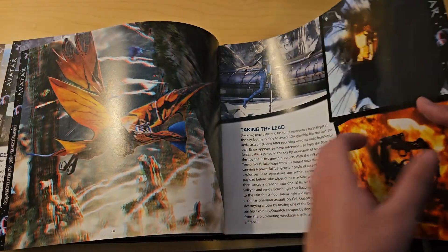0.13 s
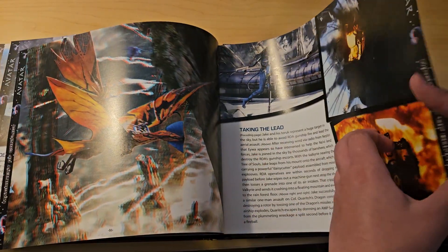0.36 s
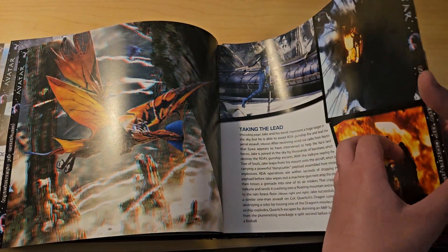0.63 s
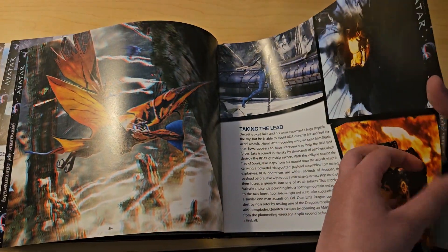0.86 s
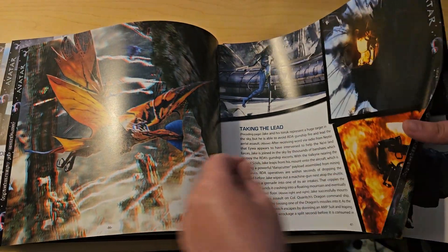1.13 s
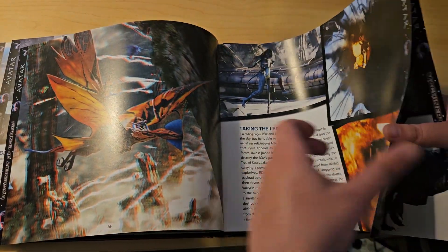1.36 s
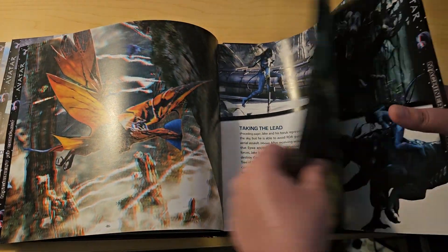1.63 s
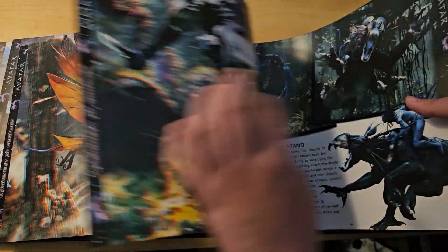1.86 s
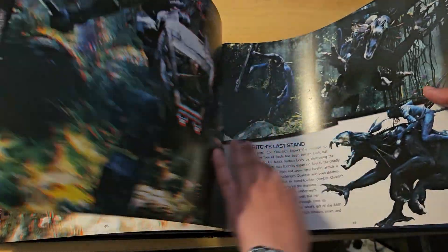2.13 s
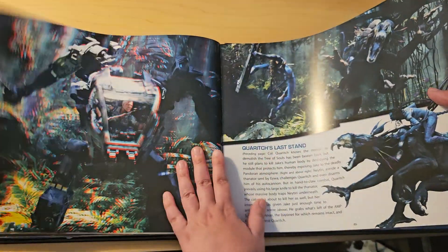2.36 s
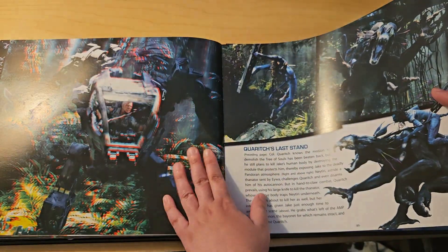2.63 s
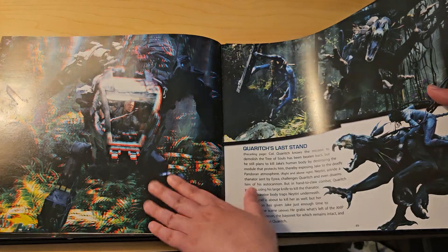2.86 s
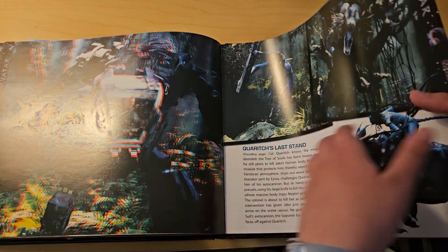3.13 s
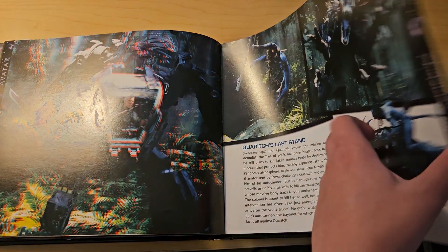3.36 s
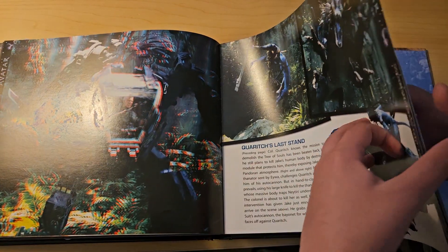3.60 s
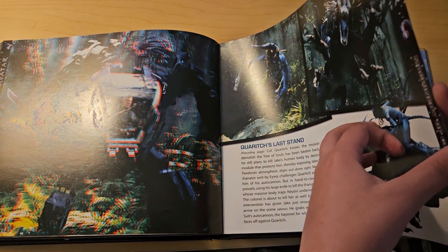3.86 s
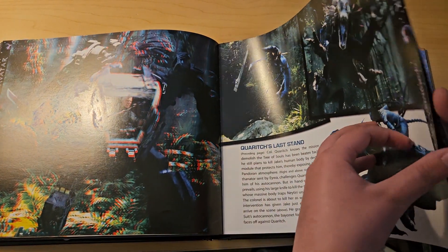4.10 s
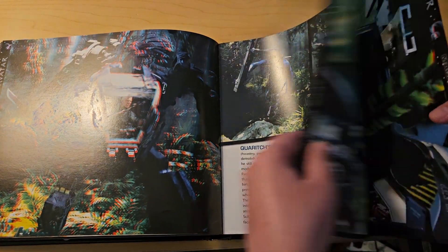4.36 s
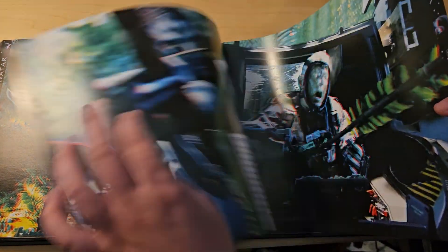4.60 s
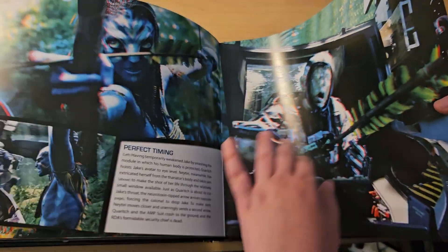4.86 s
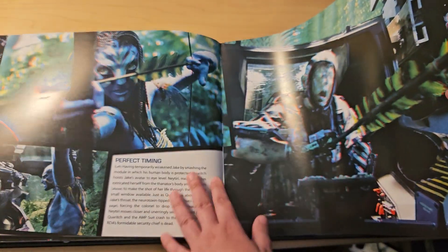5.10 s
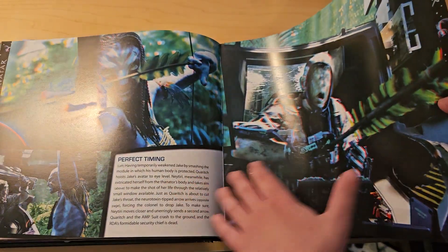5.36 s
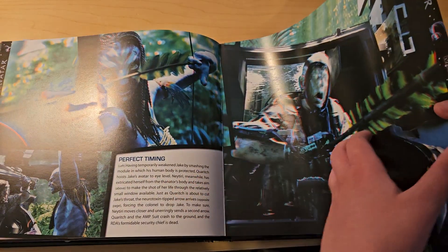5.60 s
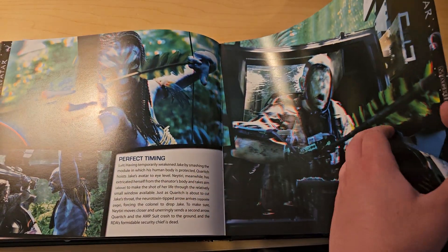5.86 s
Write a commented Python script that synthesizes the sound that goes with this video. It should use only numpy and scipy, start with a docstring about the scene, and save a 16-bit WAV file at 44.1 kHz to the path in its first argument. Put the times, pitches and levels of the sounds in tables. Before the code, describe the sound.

A large book with stiff glossy pages is handled on a table, close to a small stereo microphone in a quiet room with faint noise and an uneven, very low rumble. From 0 to 0.8 s there are only faint skin rubs and soft sheet movement. Around 0.9-1.1 s fingers scrape and slip off the page edge with bright puffs and a crisp pop. From 1.5 to 1.8 s the sheet lifts and flips in short scrapes, hollow pops and low air pushes. At 2.15-2.3 s it lands in a dense cluster of buckling pops, ending in one sharp, loud crease snap. Soft smoothing hisses follow from 2.7 to 3.1 s, then light fingertip scrapes at 3.2-3.5 s and a brighter rub at 3.7 s. A second, gentler turn runs from 4.15 to 5.1 s with wobbles, slips and small pops. Faint rubbing remains until 6 s.

```python
"""Turning the pages of a large book

Hands lift, turn and smooth glossy pages on a table, close to a small stereo microphone.
Skin hisses over the coating and page edges scrape: both are shaped noise that swells with each stroke.
The sheet wobbles and pushes air in low noise, buckles in ringing pops, and slips off fingers in bright puffs.
A crease snaps once, as a short sum of fading tones. A low, noise-like rumble, made from one uneven tone,
lies under it all in a quiet, noisy room."""
import sys
import numpy as np
from scipy import signal
from scipy.fft import irfft
from scipy.io import wavfile
from scipy.ndimage import uniform_filter1d

SR = 44100
rng = np.random.default_rng(int(sys.argv[2]) if len(sys.argv) > 2 else 0)


def boost(x):
    """Linear amplitude factor 10**(x/20) for a level x in decibels (scalar or array-like)."""
    u = np.asarray(x, float) / 20
    return 10 ** u


def dump_mix(stems):
    """Bounce the given channels to the path in sys.argv[1] as a 16-bit WAV at rate SR."""
    frames = np.atleast_2d(stems).T  # one column per channel
    limited = np.clip(frames, -1, 1)  # hard clip at full scale
    pcm = np.round(limited * 32767).astype(np.int16)
    wavfile.write(sys.argv[1], SR, pcm)


N = 263718  # length in samples

# Each stroke of hand or page climbs, holds and dies away:
# (reaches its top [s], rise [ms], hold [ms], fall [ms], skin sliding [dB], page edge scraping [dB])
STROKES = [(0.0, 10, 73, 270, -61.5, -60), (.2, 70, 66, 65, -72, -65.5), (.36, 54, 22, 56, -73, -71),
           (.42, 67, 3.8, 15, -64, -69), (.55, 100, 67, 240, -78, -67), (.7, 134, 2.5, 114, -63.5, -60),
           (.888, 5, 20, 50, -70, -57), (0.924, 29, 23, 74, -56, -47), (.99, 46, 46, 96, -43, -49),
           (1.094, 107, 3.9, 61, -38.5, -43), (1.263, 60, 6.8, 36, -75, -66.5),
           (1.424, 8, 47, 41, -67, -55), (1.503, 2.2, 2.7, 23, -56, -47), (1.532, 7.7, 37, 30, -47.5, -46),
           (1.652, 87, 120, 50, -80, -57.5), (1.743, 15, 26, 27, -46, -55), (2.07, 190, 40, 34, -70, -67),
           (2.157, 1.6, 3, 24, -48, -51), (2.192, 25, 14, 87, -51, -54), (2.252, 81, 52, 90, -46, -44),
           (2.582, 220, 26, 87, -95, -69.5), (2.69, 74, 40, 65, -60, -59.5),
           (2.816, 280, 88, 110, -51, -63.5), (2.959, 150, 60, 21, -49.5, -63.5),
           (3.072, 99, 51, 42, -71, -62.5), (3.177, 28, 6.9, 39, -53, -49), (3.205, 46, 23, 60, -54, -66),
           (3.288, 50, 25, 63, -67.5, -63.5), (3.371, 33, 3, 31, -54.5, -50),
           (3.418, 3.6, 8, 28, -51.5, -52), (3.455, 20, 10, 83, -63, -61.5),
           (3.547, 4.5, 42, 62, -69, -58.5), (3.638, 90, 44, 94, -60.5, -56.5),
           (3.728, 95, 2.1, 33, -41.5, -50.5), (3.923, 15, 24.5, 17, -66.5, -58),
           (4.043, 34, 3.9, 37, -78, -63.5), (4.148, 112, 65, 80, -57.5, -57.5),
           (4.27, 82, 5, 110, -46, -43), (4.328, 50, 27, 51, -52.5, -53), (4.453, 96, 64, 20, -53.5, -53.5),
           (4.536, 23, 2, 9.9, -40.5, -42.5), (4.553, 10, 40, 20, -63.5, -62.5),
           (4.724, 11, 1.9, 20, -90.5, -58), (4.794, 8, 2, 11, -79, -69), (4.996, 3, 52, 51, -65, -52.5),
           (5.092, 58, 1.6, 60.5, -44.5, -42.5), (5.293, 70, 15, 78, -64.5, -64.5),
           (5.369, 68, 5.3, 26, -77, -55), (5.59, 10.8, 190, 82, -69, -72),
           (5.885, 117, 4.5, 92, -70, -66.5), (5.975, 76, 5, 12, -71, -68)]
# Each bend of the page: (deepest [s], rise [ms], fall [ms], sheet wobbling [dB], air pushed [dB])
BENDS = [(.242, 270, 140, -64, -53.5), (.44, 70, 300, -66.5, -56), (.84, 60, 200, -83, -72),
         (.994, 160, 120, -56, -54.5), (1.13, 130, 99, -55, -59), (1.503, 8.2, 220, -57, -51.5),
         (1.6, 120, 26, -54, -63), (1.69, 52, 310, -64, -72), (1.764, 10, 110, -47.5, -56),
         (1.9, 88, 380, -76, -74), (2.1, 200, 100, -68, -64), (2.16, 4, 89, -47.5, -46),
         (2.2, 55, 130, -46.5, -47), (2.277, 110, 100, -49, -40.5), (2.315, 47, 127, -38, -43.5),
         (2.59, 65, 87, -66.5, -72), (2.92, 268, 40, -85, -62), (3.034, 61, 39, -63, -58),
         (3.22, 150, 82, -59.5, -55.5), (3.355, 20, 65, -54, -62), (3.442, 60, 90, -48.5, -46.5),
         (3.614, 110, 290, -64, -63), (3.729, 290, 64, -53, -61), (4.1, 440, 220, -65, -65.5),
         (4.157, 13, 120, -58.5, -49.5), (4.224, 7.2, 120, -43.5, -47), (4.35, 61, 134, -58.5, -73),
         (4.533, 12, 140, -51.5, -52), (4.72, 92, 260, -58, -60.5), (4.81, 215, 360, -58.5, -58.5),
         (4.99, 69, 50, -67, -61), (5.096, 76, 68, -52.5, -58), (5.3, 260, 114, -70.5, -63.5),
         (5.66, 305, 34, -70, -64), (5.74, 47, 50, -77.5, -63), (5.85, 41, 314, -75, -66)]
# Uneven level of the low, noise-like rumble: (time [s], level [dB])
RUMBLE_LEVEL = [(0.0, -54), (0.08, -41), (0.37, -54.5), (0.55, -50.5), (0.66, -64), (0.75, -54),
                (1.01, -53), (1.08, -75), (1.16, -58), (1.61, -54), (1.65, -73), (1.82, -52), (1.86, -68.5),
                (2.23, -49), (2.27, -59), (2.48, -50.5), (2.73, -66.5), (2.78, -45.5), (2.9, -46),
                (2.98, -58.5), (3.6, -51), (3.65, -69), (3.78, -45), (3.9, -63.5), (4.05, -49), (4.1, -68),
                (4.16, -44.5), (4.23, -66), (4.26, -49), (4.75, -63.5), (4.91, -48.5), (5.06, -54),
                (5.16, -45.5), (5.35, -56), (5.4, -48.5), (5.7, -46), (5.78, -71.5), (5.83, -51.5),
                (5.93, -52.5), (5.98, -67)]
# Uneven pitch of the rumble: (time [s], pitch [Hz])
RUMBLE_PITCH = [(0, 41.65), (1.2, 40.94), (1.75, 44), (1.95, 39.73), (2.85, 44.3), (3.05, 40.2),
                (3.3, 47.04), (4.15, 43.07), (4.55, 49.85), (4.9, 45.15), (5.98, 44.8)]
# The sheet buckles with a hollow pop:
# (time [s], level [dB], pitch [Hz], time to fade by 60 dB [s], roughness [0 to 1, larger counts as 1])
POPS = [(.226, -49, 287, 0.032, 0.27), (.228, -53, 650, 0.05, 0.45), (0.973, -38.5, 1180, 0.025, 0.8),
        (1.005, -29, 1300, 0.034, 0.97), (1.013, -38, 480, 0.074, 0.3), (1.108, -52, 450, 0.12, 0.1),
        (1.129, -49.5, 443, 0.093, 0), (1.502, -35.5, 170, 0.04, 0.25), (1.528, -37.5, 904, 0.063, 0.6),
        (1.563, -38, 277, 0.056, .53), (1.591, -46.5, 378, 0.045, 0.36), (1.763, -46.5, 328, 0.098, 0.6),
        (1.764, -43.5, 1415, 0.07, 0.2), (1.774, -39, 837, 0.068, 0.29), (2.177, -33.5, 1287, 0.086, 0.6),
        (2.191, -36.5, 304, 0.028, .65), (2.231, -38, 686, 0.076, 1), (2.256, -34, 690, 0.049, 0.9),
        (2.261, -25.5, 1500, 0.084, 0.68), (2.264, -24, 586, 0.017, .75), (2.276, -29, 547, 0.025, 0.4),
        (2.287, -27.5, 900, 0.065, 1.1), (2.3, -30.5, 270, .061, 0.3), (2.307, -27.5, 1460, .04, .5),
        (2.319, -40.5, 390, .038, .6), (3.176, -52.5, 280, 0.047, .65), (3.36, -50, 254, 0.1, 0.01),
        (3.362, -44.5, 896, 0.062, 0.94), (3.433, -44, 184, 0.029, .1), (3.444, -46, 252, 0.12, 0.45),
        (3.447, -47, 1060, 0.071, .54), (3.479, -48, 271, 0.13, 0.36), (3.922, -52.5, 704, 0.086, 0.88),
        (4.156, -39.5, 168, 0.026, 0.2), (4.157, -41.5, 279, 0.067, 0), (4.2213, -34.5, 285, 0.032, 0.25),
        (4.224, -43, 1000, 0.029, 0.75), (4.238, -39.5, 402, 0.046, 0.9), (4.432, -51, 927, 0.22, .85),
        (4.509, -47, 1395, .058, 0.12), (4.538, -41, 640, 0.038, 0.5), (4.549, -33.5, 800, 0.065, 0.27),
        (4.698, -41.5, 405, 0.053, 0.14), (4.718, -49, 415, 0.053, 0.5), (4.764, -40.5, 598, 0.056, 0.45),
        (4.765, -48, 1000, 0.026, 0), (4.81, -48, 417, 0.15, 0.1), (4.85, -55.5, 500, 0.074, 0.1),
        (4.888, -56.5, 850, .095, .4), (4.893, -47.5, 267, 0.049, .54), (4.999, -45, 1065, 0.026, 0.49),
        (5.045, -52, 1000, 0.033, .6), (5.085, -49.5, 770, 0.065, 0.6)]
# Paper slips off a finger with a bright puff:
# (time [s], level before panning [dB], pitch [Hz], time to fade by 60 dB [s], left over right [dB])
SLIPS = [(.887, -53, 2120, 0.046, 7), (0.9195, -38, 2150, 0.033, 7), (0.927, -37.5, 4440, 0.12, 6),
         (0.9729, -27, 4160, 0.06, 2), (1.0088, -23, 1900, 0.041, 6), (1.199, -54, 3000, .02, 5),
         (1.422, -46, 2620, 0.31, 0), (1.502, -40, 3190, .03, 7), (1.5272, -27.5, 2400, 0.077, -4.5),
         (1.5631, -35, 2420, 0.061, 8), (1.7641, -29, 2290, 0.056, 1), (1.9188, -48, 7100, 0.013, -1),
         (2.156, -29, 2220, 0.016, 0), (2.2274, -29, 2710, 0.067, -2), (3.4185, -46.5, 2190, .037, -1.5),
         (3.49, -55, 3800, 0.029, -3), (3.5406, -49, 4180, 0.025, 4), (4.2374, -32.5, 3130, 0.091, -6),
         (4.2754, -36.5, 3620, 0.017, -1), (4.5326, -34, 2100, 0.022, 5), (4.5823, -47, 2300, .05, 12),
         (4.9968, -42, 2980, .06, -1.5), (5.0464, -37.5, 3500, 0.087, 0), (5.0921, -33, 3716, 0.034, 4)]
# The page lands and a crease snaps: (time [s], level before the echo gains [dB])
SNAPS = [(2.2956, -10)]
# Tones of the snapping crease: (pitch [Hz], relative level [dB], time to fade by 60 dB [s])
CREASE_TONES = [(1540, -2, 0.0029), (2440, 11.5, 0.0072), (3090, 0, 0.012), (4200, -15.5, 0.0022)]
# The kick and its returns off the book and table, left port then right port: (delay [s], gain [dB])
SNAP_ECHOES = [
    [(.0001, -1), (.0014, -2), (.00185, -8.5), (.0081, -8.5), (.0146, -18.5)],
    [(.0001, 0.5), (.00105, -2), (.00155, 2), (.0081, -13.5), (.0151, -13.5)],
]

# Noise colours, of which only the shape counts: (frequency [Hz], relative level per Hz [dB])
SKIN_COLOUR = [(1500, -21), (2500, 0), (4000, -2.5), (8000, -1), (12000, -2), (16000, -6.5)]
# Page edge: (frequency [Hz], relative level per Hz [dB])
EDGE_COLOUR = [(600, -29.5), (1200, -5), (1500, -0.5), (1800, -6.5), (2150, 4.5), (2550, -3), (3000, -2),
               (3300, -1.5), (3600, -3), (4050, -4), (4600, -3.5), (5300, -9.5), (6500, -9), (10000, -31.5)]
# Wobbling sheet: (frequency [Hz], relative level per Hz [dB])
SHEET_COLOUR = [(120, -34.5), (220, 9.5), (500, -2.5), (1000, -1.5), (1400, -13.5), (2200, -54.5)]
# Pushed air: (frequency [Hz], relative level per Hz [dB])
AIR_COLOUR = [(50, 1.5), (80, 14), (130, 13), (220, -4), (320, -32.5)]
# Quiet room: (frequency [Hz], relative level per Hz [dB])
ROOM_COLOUR = [(15, -20.5), (30, 3.5), (60, -2), (90, -6.5), (160, -24.5), (280, -16.5), (360, -33),
               (700, -25.5), (950, -20.5), (1200, -27.5), (1600, -29.5), (4000, -35.5), (8500, -35),
               (10000, -61.5), (11500, -48), (16000, -65)]

# How alike left and right are in the room noise: (frequency [Hz], likeness [0 to 1])
ROOM_LIKENESS = [(60, 0.93), (130, 0.88), (300, 0.078), (700, 0.37), (1400, 0), (3000, 0), (15000, 0.052)]
# The same for the nearby paper: (frequency [Hz], likeness [0 to 1])
PAPER_LIKENESS = [(100, 0.99), (500, 0.9), (1000, 0.87), (2000, 0.21), (4000, 0.092), (15000, 0.11)]
# Colour of the two microphone ports: (frequency [Hz], left gain [dB], right gain [dB])
PORTS = [(1000, 0.5, 0.5), (2100, -0.5, -2), (3500, -1.5, 0), (4500, 2, -0.5), (5530, -1, -4),
         (6790, -3, -5.5), (7300, -5, 2.5), (9060, -0.5, -2.5), (9200, -3.5, -7), (9400, -12.5, -19.5),
         (10600, -4, -10.5), (12600, 0.5, 2), (14400, -0.5, 7.5), (15900, 8, 5.5), (16000, -33, -32),
         (16400, -80, -84.5)]

ROOM_DB = -60.5
REST_SKIN_DB, REST_EDGE_DB = -100, -87.5  # hands lying on the paper between strokes
REST_SHEET_DB, REST_AIR_DB = -71.5, -75  # the page never lies quite still
EDGE_FOLLOW, AIR_FOLLOW = 0.82, 1.28  # steepness of the slopes; at 1, a rise or fall time spans 20 dB
BOW = 1.026  # the slopes steepen away from the top by this power
STROKE_PAN_DB = 0.6  # left over right
POP_RISE_S, POP_RISE_SHARE = 0.0006, 0.02  # rise time: a least value plus a share of the fade time


def read(points, hz, column=1):
    """Reads a spectrum on a log-frequency axis."""
    points = np.transpose(points)
    return np.interp(np.log(hz + 1), np.log(points[0] + 1), points[column])


def evened(x):
    """Scales to an rms of 1."""
    return x / np.sqrt(np.mean(x ** 2) + 1e-20)


def add(mix, s, sound):
    """Mixes a sound into all channels at time s."""
    part = mix[:, round(s * SR):][:, :sound.shape[1]]
    part += sound[:, :part.shape[1]]


def sides(pan_db):
    """Left and right gains."""
    return boost(np.array([pan_db / 2, -pan_db / 2]))


def noise(colour, likeness, size, patchy_db, flicker_db):
    """Stereo noise from random short-time spectra, with drifting patches and a flicker shared by all bins."""
    hz = np.fft.rfftfreq(size, 1 / SR)
    frames = 4 * N // size + 8
    a, b, c, d, patches = rng.standard_normal((frames, len(hz), 5)).T
    flicker = evened(uniform_filter1d(rng.standard_normal(frames), size=3))
    patches = uniform_filter1d(patches, size=6, axis=0)  # smooth over frequency
    patches = evened(uniform_filter1d(patches, size=16, axis=1))  # smooth over time
    like = read(likeness, hz)[:, None]
    left = a + 1j * b
    right = like * left + np.sqrt(1 - like ** 2) * (c + 1j * d)
    level_db = read(colour, hz)[:, None] + patchy_db * patches + flicker_db * flicker
    spectra = np.array([left, right]) * boost(level_db)
    return evened(signal.istft(spectra, nperseg=size, noverlap=3 * size // 4)[1][:, :N])


def swells(rows, follow, rest_db):
    """Gain of events (top s, rise ms, hold ms, fall ms, dB) that climb and fall in dB over a resting level."""
    ms = np.arange(N) / SR * 1000
    power = np.full(N, boost(rest_db) ** 2)
    for top, rise, hold, fall, db in rows:
        late = ms - top * 1000
        away = np.maximum(-late / rise, (late - hold) / fall)  # 0 or less during the hold
        power = power + boost(db - 20 * follow * np.clip(away, 0, 8) ** BOW) ** 2
    return np.sqrt(power)


def catches(per_s, spread_db, decay_s):
    """Gain of an edge that sticks and lets go at random: sudden rises, quick falls."""
    size = boost(spread_db * np.minimum(rng.exponential(1, N), 4))
    jumps = size * (rng.random(N) < per_s / SR)
    return evened(1 + signal.lfilter([0.3], [1, -np.exp(-1 / (decay_s * SR))], jumps))


def strokes():
    """Skin drags smoothly over the coating; page edges catch and scrape unevenly."""
    sliding = swells([(*shape, db) for *shape, db, _ in STROKES], 1, REST_SKIN_DB)
    scraping = swells([(*shape, db) for *shape, _, db in STROKES], EDGE_FOLLOW, REST_EDGE_DB)
    grip = catches(per_s=120, spread_db=2.5, decay_s=0.004)
    skin = noise(SKIN_COLOUR, PAPER_LIKENESS, size=256, patchy_db=0.2, flicker_db=2.0)
    skin = skin * grip ** 0.33  # skin catches less than the edge
    edge = noise(EDGE_COLOUR, PAPER_LIKENESS, size=512, patchy_db=3.5, flicker_db=2.1) * grip
    return sides(STROKE_PAN_DB)[:, None] * (sliding * skin + scraping * edge)


def table_top(x, echo_db):
    """A few early echoes off the table, pages and hands, different at each port, comb the sound."""
    taps = np.zeros((2, 500))
    at = rng.integers(30, 500, (2, 6))  # delays in samples
    gains = rng.choice([-1., 1.], at.shape) * boost(echo_db - at / 60)  # later echoes are weaker
    np.put_along_axis(taps, at, gains, 1)
    taps[:, 0] = 1  # the direct sound
    taps = taps / np.linalg.norm(taps, axis=1)[:, None]
    return signal.oaconvolve(x, taps, axes=1)[:, :N]


def wobbling_sheet():
    """The stiff sheet wobbles in lumpy low noise that swells with each bend."""
    gain = swells([(s, rise, 0, fall, db) for s, rise, fall, db, _ in BENDS], 1, REST_SHEET_DB)
    return gain * noise(SHEET_COLOUR, PAPER_LIKENESS, size=512, patchy_db=3.0, flicker_db=2.0)


def pushed_air():
    """The bending page pumps air in slow swings whose size follows the bend."""
    gain = swells([(s, rise, 0, fall, db) for s, rise, fall, _, db in BENDS], AIR_FOLLOW, REST_AIR_DB)
    air = noise(AIR_COLOUR, PAPER_LIKENESS, size=2048, patchy_db=-1.0, flicker_db=4.5)
    nearby_power = uniform_filter1d((air ** 2).mean(0), size=1200)
    return gain * evened(air / np.sqrt(nearby_power + 0.15))  # evens out the loud moments


def rumble():
    """A low, noise-like rumble: one tone of uneven pitch and level around 44 Hz, alike in both channels."""
    t = np.arange(N) / SR
    hz = np.interp(t, *np.transpose(RUMBLE_PITCH))
    db = np.interp(t, *np.transpose(RUMBLE_LEVEL))
    turns = np.cumsum(hz) / SR + rng.random()
    return np.sqrt(2) * boost(db) * np.sin(2 * np.pi * turns)


def room_noise():
    """The quiet room is a steady, mostly low noise with faint patches."""
    return boost(ROOM_DB) * noise(ROOM_COLOUR, ROOM_LIKENESS, size=2048, patchy_db=2.6, flicker_db=-0.3)


def pop(db, hz, t60, rough, rise_s, share, like, lag_s):
    """A bent patch of the sheet rings on one tone, blurred by neighbouring patches."""
    t = np.arange(SR // 4) / SR
    rough = np.clip(rough, 0, 1)
    band = signal.butter(2, (hz / (1 + share), hz * (1 + share)), "bandpass", fs=SR, output="sos")
    blur = signal.sosfilt(band, rng.standard_normal((2, len(t) + 2000)))[:, 2000:]  # skip the filter's start
    blur[1] = like * blur[0] + np.sqrt(1 - like ** 2) * blur[1]
    swing = (1 - np.exp(-t / rise_s)) ** 2 * boost(-60 * t / t60)
    lag = np.array([[lag_s], [0]])  # the left port is a little farther
    tone = -np.sqrt(2) * np.sin(2 * np.pi * hz * (t - lag))
    body = np.sqrt(1 - rough) * tone + np.sqrt(rough) * evened(blur)
    return boost(db) * swing / swing.max() * body / np.sqrt(2)


def slip(db, hz, t60, share, pan_db, rise_s, kick, like):
    """A kick and a dying puff of noise ring in one broad band as paper leaves a finger."""
    t = np.arange(SR // 4) / SR
    puff = rng.standard_normal((2, len(t)))
    puff[1] = like * puff[0] + np.sqrt(1 - like ** 2) * puff[1]
    drive = puff * (1 - np.exp(-t / rise_s)) ** 2 * boost(-60 * t / t60)
    drive[:, round(rise_s * SR)] -= kick / np.sqrt(hz / SR)
    band = signal.butter(2, (hz / (1 + share), hz * (1 + share)), "bandpass", fs=SR, output="sos")
    ring = signal.sosfilt(band, drive)
    return sides(pan_db)[:, None] * boost(db) * ring / abs(ring).max()


def snap():
    """One sharp kick rings the crease and returns from nearby surfaces."""
    out = np.zeros((2, N))
    t = np.arange(1000) / SR
    tones = sum(boost(db - 60 * t / t60) * np.sin(2 * np.pi * hz * t) for hz, db, t60 in CREASE_TONES)
    ring = -tones * (1 - np.exp(-t / 0.0001))
    ring = ring[None] / abs(ring).max()
    for s, db in SNAPS:
        for port, echoes in zip(out, SNAP_ECHOES):
            for late, echo_db in echoes:
                add(port[None], s + late, boost(db + echo_db) * ring)
    return out


def hits():
    """Pops of the sheet, slips off the fingers and the snap of the crease."""
    out = snap()
    for s, db, hz, t60, rough in POPS:
        rise_s = POP_RISE_S + POP_RISE_SHARE * t60
        add(out, s, pop(db, hz, t60, rough, rise_s, share=0.59, like=0.64, lag_s=0.00008))
    for s, db, hz, t60, pan_db in SLIPS:
        add(out, s, slip(db, hz, t60, 0.54, pan_db, rise_s=0.00047, kick=0.1, like=0.16))
    return out


def walls(x):
    """Sparse reflections of random sign, duller and weaker with time."""
    t = np.arange(300, SR // 3) / SR
    taps = rng.choice([-1., 1.], (2, len(t))) * (rng.random((2, len(t))) < 0.05)
    low = signal.sosfilt(signal.butter(1, 1200, fs=SR, output="sos"), taps)
    tail = low * boost(-60 * t / 0.23) + (taps - low) * boost(-60 * t / 0.13)  # the treble fades sooner
    tail = np.pad(tail / np.linalg.norm(tail[0]), ((0, 0), (300, 0)))
    return signal.fftconvolve(x, tail, axes=1)[:, :N]


def scene():
    """Paper near the microphone, its reflections, the room and the rumble."""
    sharp = hits()
    rubbing = table_top(strokes(), echo_db=-9.0)
    flexing = wobbling_sheet() + pushed_air()
    reflections = boost(-12) * walls(sharp + 0.29 * rubbing)
    return sharp + rubbing + flexing + reflections + room_noise() + rumble()


def roll_off(x):
    """The treble ends steeply here."""
    return signal.sosfilt(signal.butter(12, 16620, fs=SR, output="sos"), x)


def record(dry):
    """Each microphone port colours the sound in its own way, through a filter of its own."""
    hz = np.fft.rfftfreq(1024, 1 / SR)
    colour = boost(np.array([read(PORTS, hz, column=1), read(PORTS, hz, column=2)]))
    taps = np.roll(irfft(colour), 512, axis=1) * np.hanning(1024)
    mix = signal.oaconvolve(dry, taps, axes=1)[:, 512:512 + N]  # takes out the filter's delay
    return roll_off(mix)


dry = scene()
out = record(dry)
dump_mix(out)
```